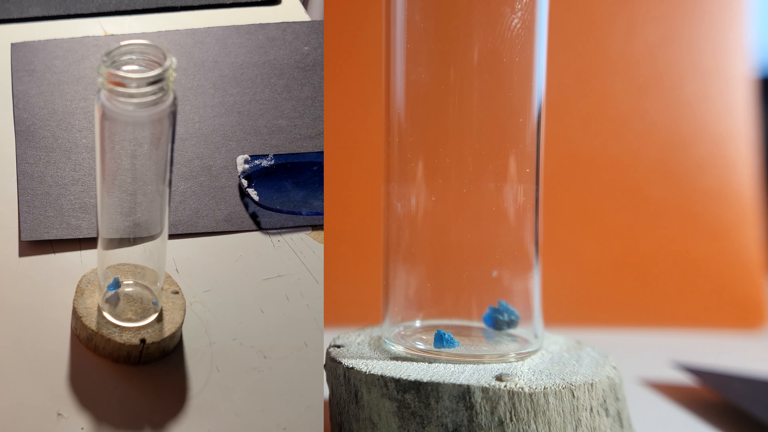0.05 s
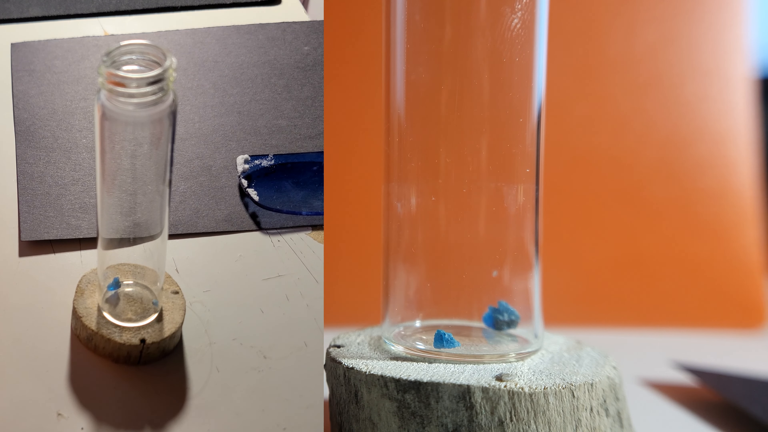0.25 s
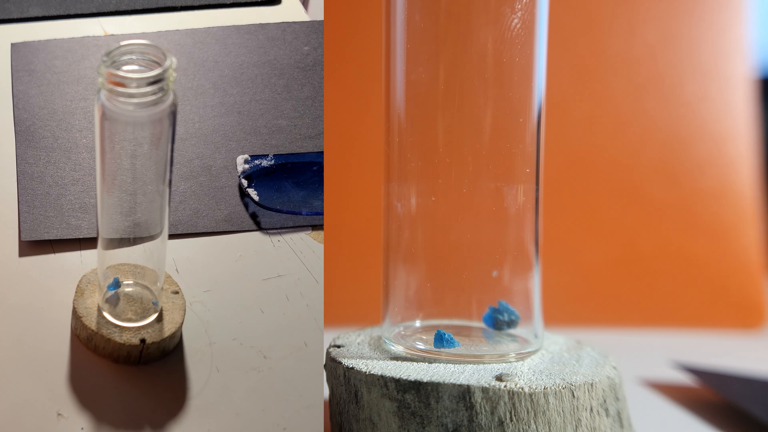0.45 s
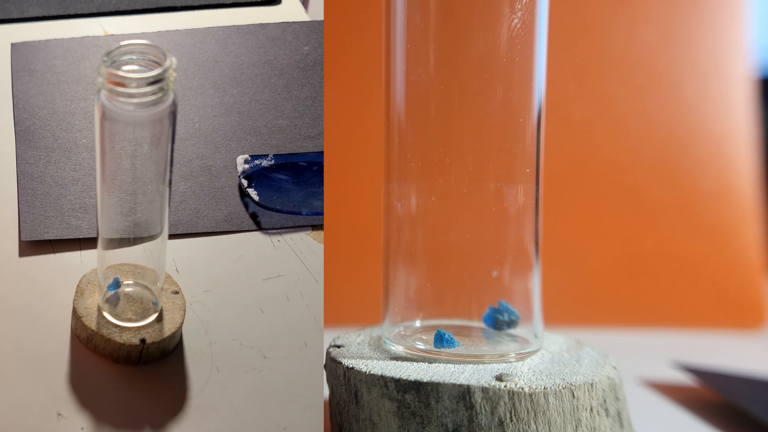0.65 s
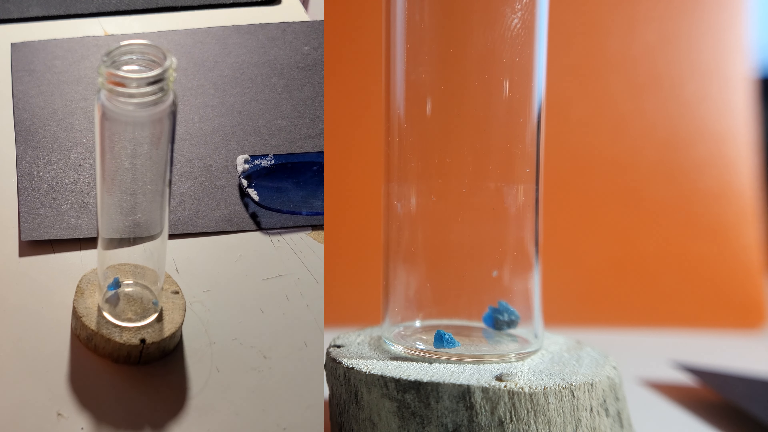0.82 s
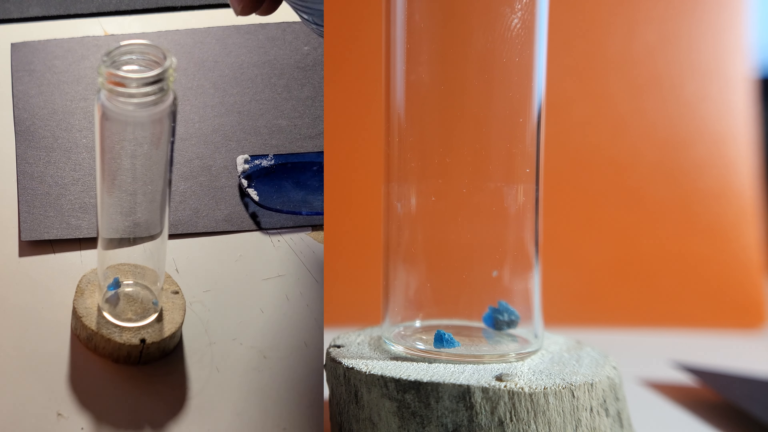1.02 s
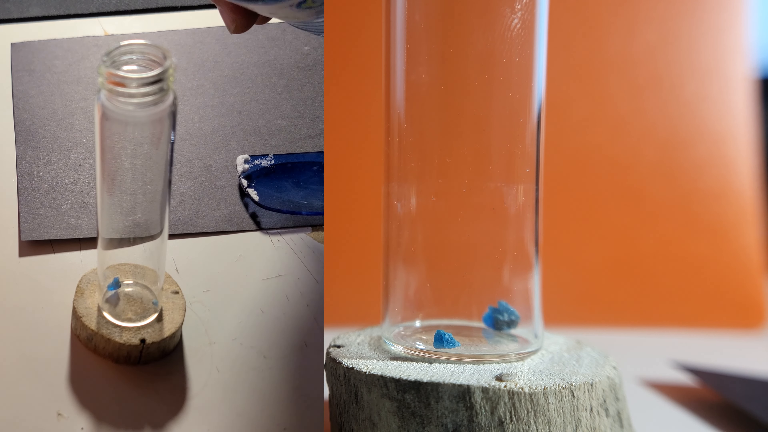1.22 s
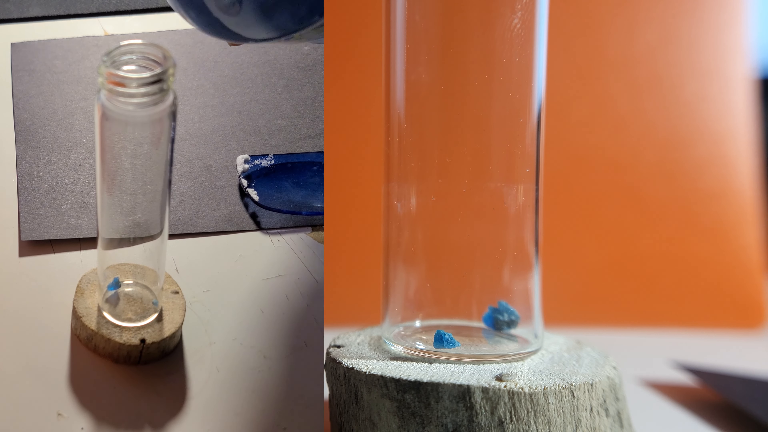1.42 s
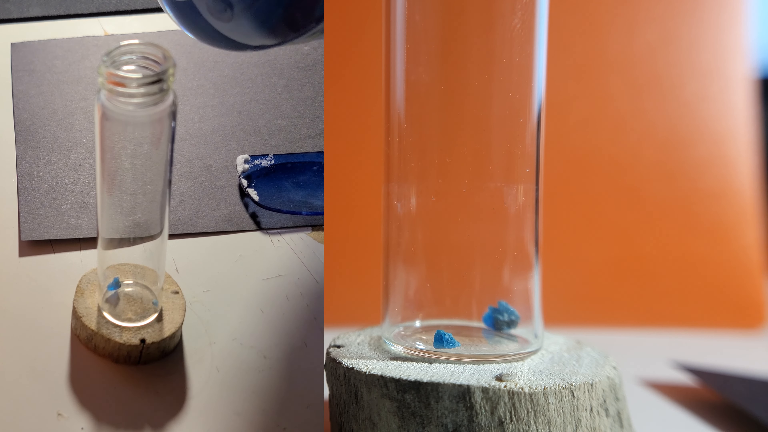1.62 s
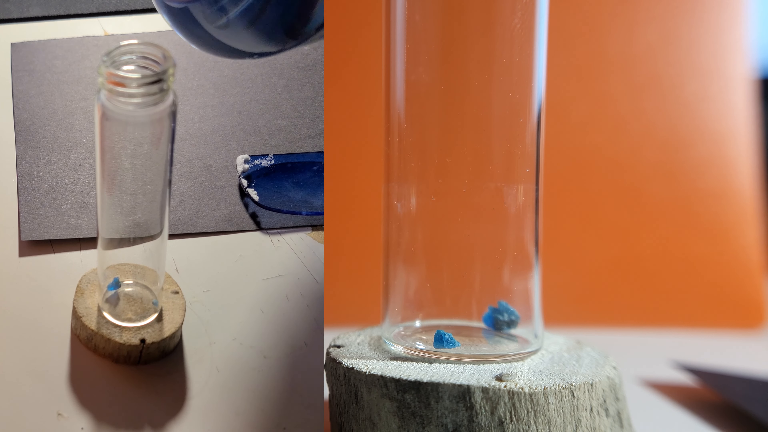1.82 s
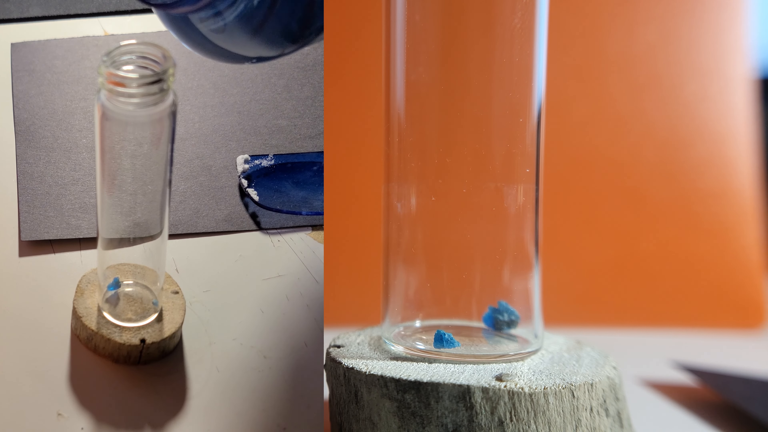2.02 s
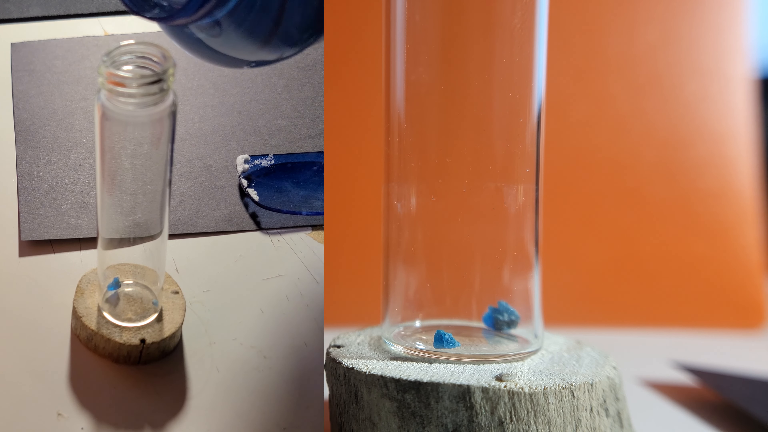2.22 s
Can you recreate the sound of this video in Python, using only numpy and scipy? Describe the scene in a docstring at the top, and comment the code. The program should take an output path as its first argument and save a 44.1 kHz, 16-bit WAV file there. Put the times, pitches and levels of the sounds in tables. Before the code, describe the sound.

A few knocks and clicks from small things handled on a tabletop, with faint rustling.

```python
"""A quiet room, where small things are handled on a table close to the right microphone.
Something is put down and the table top rings with the knock. A fingertip rubs and squeaks,
a hard part clicks and a sleeve slides. A plastic object clacks, then judders as it sticks and slips
over the table; a light tick and a soft bump follow. Hits are made of fading tones and short bursts
of noise, rubbing is grainy noise that swells and fades, and a low hum lies under it all."""
import sys
import numpy as np
from scipy import signal
from scipy.fft import rfft, irfft, next_fast_len
from scipy.io import wavfile
from scipy.ndimage import map_coordinates

SR = 44100
rng = np.random.default_rng(int(sys.argv[2]) if len(sys.argv) > 2 else 0)


def wav_out(sig):
    """Save sig, one row per channel (or a flat mono array), as 16-bit PCM at SR to the path in sys.argv[1]."""
    wavfile.write(sys.argv[1], SR, np.round(np.clip(np.atleast_2d(sig).T, -1, 1) * 32767).astype(np.int16))


N = 103635

# Tone colours: how strong each sound is from bass to treble. Each row: frequency in Hz, level in dB.
BACKGROUND_COLOUR = [(15, -54), (28, -31), (40, -9), (54, -1.5), (80, -2.5), (100, -15), (150, -18.5),
                     (200, -16), (300, -21.5), (550, -27), (1130, -31.5), (3430, -36.5), (6380, -49),
                     (7500, -51.5), (9000, -45), (15000, -46), (16000, -48)]
SHIFT_COLOUR = [(40, -25), (100, -1.5), (160, -9.5), (210, 1.5), (300, -5), (450, -8.5), (700, -24),
                (1500, -34.5), (4000, -63.5)]
BRUSH_COLOUR = [(1000, -17.5), (3000, -10), (4500, -10.5), (6300, -12.5), (7500, -20), (8300, 3.5),
                (10000, -2), (12500, -5.5), (16000, -14.5)]
JOSTLE_COLOUR = [(25, -36), (48, 1.5), (70, 7), (100, 2), (150, -11.5), (250, -24), (600, -42), (2000, -90)]
CONTACT_COLOUR = [(30, -59), (150, 4.5), (400, -13.5), (800, -2.5), (1300, -1), (1600, -4.5), (2200, -1),
                  (3300, -8), (4500, -18), (7500, -24), (9000, -20), (15000, -34.5)]
BUMP_COLOUR = [(25, -59), (60, -2), (130, 6), (300, -3), (650, -2.5), (1200, -13.5), (2500, -21.5),
               (5000, -30), (12000, -62)]
CLICK_COLOUR = [(40, -60), (300, -30), (900, 2.5), (1700, -29), (3000, 0), (4500, -2.5), (6500, -1),
                (7500, -12), (8400, 5.5), (10500, 3.5), (13000, 2.5), (16000, 1.5)]
SQUEAK_COLOUR = [(400, -13.5), (1400, -22), (1800, -11), (2400, -12.5), (2950, 2), (3200, -2), (3450, -22),
                 (4000, -18), (5000, -29), (7400, -31.5), (9000, -23), (15000, -49)]
SLEEVE_COLOUR = [(300, -3.5), (800, -4.5), (1300, 3), (1800, -1.5), (3000, 5), (4300, -4.5), (6300, -7.5),
                 (7500, -16.5), (8500, -4.5), (10500, -12), (12500, -26.5), (16000, -26)]
PLASTIC_COLOUR = [(30, -51), (150, -17.5), (500, -2.5), (900, -6), (1600, -11.5), (2200, 0.5), (3000, -0.5),
                  (3700, -5), (4500, -22.5), (6500, -21), (9000, -33), (15000, -54)]
SCRAPE_COLOUR = [(40, -35), (150, -2), (350, -11), (520, 11.5), (750, -5), (1100, -6), (1550, -14.5),
                 (2200, -5), (3550, -2.5), (4100, -27), (4900, -12.5), (6300, -21.5), (7500, -41),
                 (9500, -23.5), (15000, -61)]
ECHO_COLOUR = [(150, -13.5), (500, -12.5), (1500, -14), (3000, -16), (6000, -12.5), (12000, -22.5)]
# The room's hum. Each row: pitch in Hz, level in dB.
HUM_TONES = [(54, -67.5), (74, -66.5)]

# Rubbing strokes. Each row: time of the peak in seconds, seconds to rise by 20 dB,
# seconds to fall by 20 dB, peak level in dB.
SHIFT_STROKES = [(.09, 0.37, .2, -50.5), (.385, 0.13, 0.22, -51), (.77, 0.16, 0.14, -53),
                 (1.12, .15, 0.33, -48.5), (1.61, 0.03, 0.13, -54.5)]
BRUSH_STROKES = [(.062, 0.057, 0.097, -54), (.148, .06, 0.047, -59), (1.625, 0.04, 0.05, -65),
                 (1.735, 0.16, 0.14, -62.5)]
JOSTLE_STROKES = [(.11, 0.07, .08, -46.5), (.58, 0.3, 0.3, -53), (1.615, 0.058, 0.17, -48),
                  (1.70, 0.11, 0.25, -52), (1.86, 0.061, 0.17, -48.5)]
FINGER_STROKES = [(.514, 0.019, 0.042, -49.5), (.575, 0.023, .02, -48.5), (.587, 0.0091, 0.02, -47.5),
                  (.602, 0.016, 0.018, -46.5), (.613, 0.011, .025, -53.5)]
SLEEVE_STROKES = [(.78, 0.034, 0.15, -58), (.88, 0.14, 0.075, -55.5), (.98, 0.13, 0.18, -47),
                  (1.04, 0.12, 0.04, -49)]
SCRAPE_STROKES = [(1.188, 0.037, 0.03, -33.5)]

# Knocks on the table. Each row: start in seconds, ring level in dB, hard contact level in dB.
KNOCKS = [(.108, -43, -72), (0.2214, -35, -43), (0.2322, -19.5, -30), (.2412, -26, -36), (0.2581, -30, -47),
          (0.4045, -42, -60), (0.4348, -44.5, -63), (.6525, -37.5, -34.5), (0.6591, -37, -47.5),
          (0.67, -49, -48), (1.0493, -30.5, -39), (1.107, -47, -72)]
# Soft bumps, sharp clicks, light ticks and the plastic's slips. Each row: start in seconds, level in dB.
BUMPS = [(.1120, -52.5), (0.163, -46), (0.749, -53), (1.5990, -57), (1.8397, -41), (1.8510, -46.5)]
CLICKS = [(.2405, -52), (.4050, -65), (.4150, -67.5), (.4360, -60), (.6495, -22.5), (.6595, -48),
          (.6690, -56)]
TICKS = [(.4045, -62), (1.8058, -41)]
SLIPS = [(1.1587, -40.5), (1.17, -36), (1.1762, -33), (1.1815, -29), (1.1885, -29.5), (1.1943, -31.5),
         (1.2015, -39.5), (1.2150, -61)]
# Clacks of the plastic object. Each row: start in seconds, level in dB, left minus right in dB.
CLACKS = [(0.933, -55.5, 0), (0.978, -40.5, 5.5), (1.035, -39.5, 6), (1.0477, -34.5, -7),
          (1.0534, -26.5, -2.5), (1.0855, -48, 5), (1.106, -49, 4)]
# The tones a struck thing rings with. Each row: pitch in Hz, level in dB, seconds to fade by 60 dB.
TABLE_TONES = [(200.4, -3, .11), (278.4, 0.5, 0.058), (318.7, 2, 0.051), (394.5, 0, 0.052),
               (579, -16.5, 0.061), (797, -17, 0.046), (1157, -24.5, 0.097), (1313, -13.5, 0.068),
               (2284, -23, 0.052)]
TICK_TONES = [(1780, -9, 0.011), (2290, -1.5, 0.013), (2940, -6, .02), (3463, 1.5, 0.027),
              (3580, -2, 0.032), (5930, -21, .01)]
JUDDER_TONES = [(482, 1.5, 0.043), (531, 1.5, 0.05), (597, -7.5, .04), (2050, -11, .02), (2740, -18, .05),
                (2730, -17, 0.044), (3450, -7, 0.037)]

# How long the room echoes. Each row: frequency in Hz, seconds to fade by 60 dB.
ECHO_TIMES = [(150, 0.2), (500, 0.28), (2500, 0.28), (9000, 0.27), (15000, 0.3)]
# How alike noise is at the two microphones. Each row: frequency in Hz, likeness from 0 to 1.
LIKENESS = [(50, 0.81), (250, 0.71), (600, 0.22), (1500, 0.075), (4000, 0.015)]
# Balance of the background and of the handling. Each row: frequency in Hz, left minus right in dB.
BACKGROUND_BALANCE = [(60, 7.0), (300, 5.5), (1000, -0.3), (4000, -1.0), (12000, -1.2)]
HANDLING_BALANCE = [(60, 0.5), (150, -1), (400, -3.5), (1200, -2), (3900, -5), (5200, -16), (9000, -23),
                    (15000, -15)]  # scaled by depth in microphones()


def amp(db):
    """Turn decibels into a gain to multiply by."""
    return 10 ** (np.asarray(db) / 20)


def unit(x):
    """Scale a signal to an average power of 1."""
    return x / np.sqrt(np.mean(x ** 2) + 1e-20)


def unit_hit(x):
    """Give a hit the energy of 5 ms of sound at power 1."""
    return x / np.sqrt(np.mean(np.sum(x ** 2, axis=-1)) / (SR * .005))


def along(points, hz):
    """Read between a table's rows, on a logarithmic frequency scale."""
    freqs, values = np.transpose(points)
    return np.interp(np.log(hz + 1), np.log(freqs + 1), values)


def filtered(x, response):
    """Multiply each frequency in x by response(hz)."""
    n = x.shape[-1]
    size = next_fast_len(n + SR // 10)
    return irfft(rfft(x, size) * response(np.fft.rfftfreq(size, 1 / SR)), size)[..., :n]


def coloured(x, colour, size=2048):
    """Give x a tone colour without smearing it earlier in time."""
    cepstrum = irfft(np.log(amp(along(colour, np.fft.rfftfreq(size, 1 / SR)))))
    # Folding the second half onto the first makes the filter ring only after a hit.
    cepstrum[1:size // 2] *= 2
    cepstrum[size // 2 + 1:] = 0
    kernel = irfft(np.exp(rfft(cepstrum)))
    return signal.fftconvolve(x, kernel[None], axes=1)[:, :x.shape[1]]


def stereo_noise(n):
    """White noise at two microphones, alike in the bass."""
    def shares(hz):
        angle = np.arccos(np.clip(along(LIKENESS, hz), -1, 1)) / 2
        return np.array([np.cos(angle), np.sin(angle)])
    mid, side = filtered(rng.standard_normal((2, n)), shares)
    return np.array([mid + side, mid - side])


def wobble(rate):
    """A smooth curve through `rate` random points a second."""
    return map_coordinates(rng.standard_normal(int(N * rate / SR) + 4), [np.arange(N) * rate / SR])


def add(out, start, x):
    """Mix x into out, beginning at `start` seconds."""
    part = out[:, round(start * SR):][:, :x.shape[-1]]
    part += x[..., :part.shape[1]]


def friction(strokes, colour, grain_db, grain_rate):
    """Rubbing: noise that swells with each stroke, made grainy by a random flutter in level."""
    t = np.arange(N) / SR
    power = sum(amp(db - 20 * np.maximum((peak - t) / rise, (t - peak) / fall)) ** 2
                for peak, rise, fall, db in strokes)
    grains = stereo_noise(N) * amp(grain_db * wobble(grain_rate))
    return np.sqrt(power) * unit(coloured(grains, colour))


def ring(tones, attack_s):
    """A struck thing rings with fading tones, their levels a little different at each hit."""
    t = np.arange(SR // 4) / SR
    ringing = sum(amp(db + rng.normal() - 60 * t / fade_s) * np.sin(2 * np.pi * hz * t)
                  for hz, db, fade_s in tones)
    return unit_hit(ringing * (1 - np.exp(-t / attack_s)))


def contact(colour, fade_s, noise_db):
    """Two things meet: one spike and a dying burst of noise, coloured by the object."""
    t = np.arange(SR // 4) / SR
    spike = unit_hit(1. * (t == 0))
    burst = unit_hit(stereo_noise(len(t)) * amp(-60 * t / fade_s))
    return unit_hit(coloured(spike + amp(noise_db) * burst, colour))


def background():
    """The room's steady low rumble and faint hiss."""
    def gains(hz):
        balance_db = np.outer([.5, -.5], along(BACKGROUND_BALANCE, hz))
        return amp(along(BACKGROUND_COLOUR, hz) + balance_db)
    return amp(-56) * unit(filtered(stereo_noise(N), gains))


def hum():
    """The room hums with two low wavering tones, stronger on the left."""
    t = np.arange(N) / SR
    tones = sum(amp(db + 0.99 * wobble(6.55)) * unit(np.sin(2 * np.pi * hz * t + 0.54 * wobble(5.65)))
                for hz, db in HUM_TONES)
    return amp([[2], [-2]]) * tones


def shifting():
    """Things shift about with a low rumble."""
    return friction(SHIFT_STROKES, SHIFT_COLOUR, grain_db=3.5, grain_rate=90)


def brushing():
    """Light brushing makes a fine, high hiss."""
    return friction(BRUSH_STROKES, BRUSH_COLOUR, grain_db=2.5, grain_rate=1200)


def jostling():
    """The table is jostled and gives a deep rumble."""
    return friction(JOSTLE_STROKES, JOSTLE_COLOUR, grain_db=3.0, grain_rate=40)


def table_knocks():
    """Hard contacts ring the table top, which is too small to give off much bass."""
    contacts, thuds = np.zeros((2, N)), np.zeros((2, N))
    for start, ring_db, contact_db in KNOCKS:
        add(thuds, start, amp(ring_db) * ring(TABLE_TONES, attack_s=0.0013))
        add(contacts, start, amp(contact_db) * contact(CONTACT_COLOUR, fade_s=0.053, noise_db=7))
    bass_cut = signal.butter(2, 182, 'highpass', fs=SR, output='sos')  # weakens below 182 Hz
    return contacts + signal.sosfilt(bass_cut, thuds)


def soft_bumps():
    """Soft bumps thud on the table without ringing it."""
    out = np.zeros((2, N))
    for start, db in BUMPS:
        add(out, start, amp(db) * contact(BUMP_COLOUR, fade_s=0.24, noise_db=11))
    return out


def clicks(noise_db):
    """A hard part snaps with short, bright clicks."""
    out = np.zeros((2, N))
    for start, db in CLICKS:
        add(out, start, amp(db) * contact(CLICK_COLOUR, fade_s=.009, noise_db=noise_db))
    return out


def ticks():
    """A small hard object is touched and rings briefly, softer on the left."""
    out = np.zeros((2, N))
    for start, db in TICKS:
        add(out, start, amp(db) * amp([[-5], [0]]) * ring(TICK_TONES, attack_s=0.0012))
    return out


def finger_squeaks():
    """A fingertip rubs in quick strokes, squeaking near 3000 Hz."""
    return friction(FINGER_STROKES, SQUEAK_COLOUR, grain_db=-1.0, grain_rate=290)


def sleeve():
    """A sleeve slides with a soft swish."""
    return friction(SLEEVE_STROKES, SLEEVE_COLOUR, grain_db=1.0, grain_rate=200)


def plastic_object():
    """The object clacks as it is gripped, then sticks, slips and scrapes over the table."""
    out = np.zeros((2, N))
    for start, db, balance_db in CLACKS:
        sides = amp([[balance_db / 2], [-balance_db / 2]])
        add(out, start, amp(db) * sides * contact(PLASTIC_COLOUR, fade_s=0.016, noise_db=8.5))
    for start, db in SLIPS:
        ringing = amp(-5.0) * ring(JUDDER_TONES, attack_s=0.00045)
        tap = amp(-7.5) * contact(PLASTIC_COLOUR, fade_s=0.0055, noise_db=20)
        add(out, start, amp(db) * (ringing + tap))
    return out + friction(SCRAPE_STROKES, SCRAPE_COLOUR, grain_db=0.0, grain_rate=500)


def room_echo(x):
    """The small room answers 5 ms later, each frequency dying at its own speed."""
    hz, t, noise = signal.stft(stereo_noise(SR // 2), SR, nperseg=256)
    fade_s = along(ECHO_TIMES, hz)[:, None]
    fade = amp(-60 * t / fade_s)
    fade *= np.sqrt(2 * np.log(1000) / (fade_s * SR))  # long and short echoes get equal energy
    tail = signal.istft(noise * fade * amp(along(ECHO_COLOUR, hz))[:, None], SR, nperseg=256)[1]
    late_tail = np.pad(tail, ((0, 0), (round(.005 * SR), 0)))
    return signal.fftconvolve(x, late_tail, axes=1)[:, :N]


def microphones(x, depth, lag_s=.00022):
    """The left microphone is farther away, so it hears the handling later and duller."""
    def far_side(hz):
        return amp(depth * along(HANDLING_BALANCE, hz)) * np.exp(-2j * np.pi * hz * lag_s)
    return np.array([filtered(x[0], far_side), x[1]])


def scene():
    """The handling sounds and their echo, over the room's background and hum."""
    handling = table_knocks() + soft_bumps() + ticks() + plastic_object()
    handling += finger_squeaks() + sleeve() + brushing() + shifting() + jostling()
    direct = handling + clicks(noise_db=-2)
    echo = room_echo(handling + clicks(noise_db=-60))  # only the spike of each click echoes
    return microphones(direct, depth=1.09) + microphones(echo, depth=0.58) + background() + hum()


def record(dry):
    """Cut away the highest treble, above 16200 Hz."""
    return filtered(dry, lambda hz: 1 / np.sqrt(1 + (hz / 16200) ** 160))


dry = scene()
out = record(dry)
wav_out(out)
```